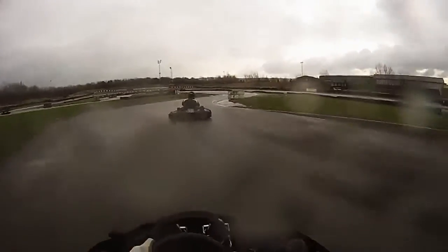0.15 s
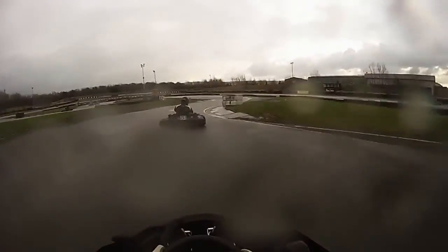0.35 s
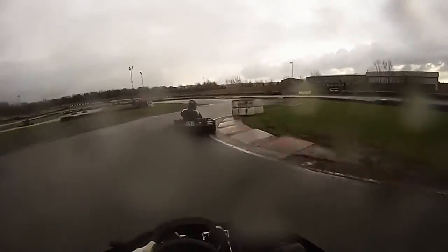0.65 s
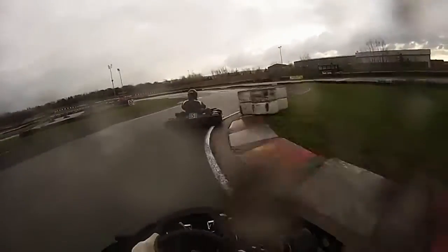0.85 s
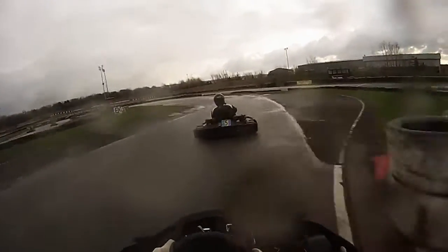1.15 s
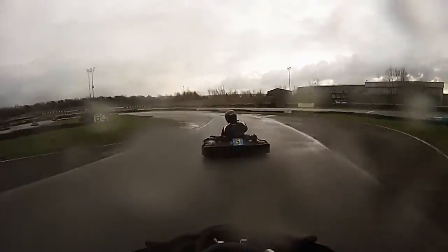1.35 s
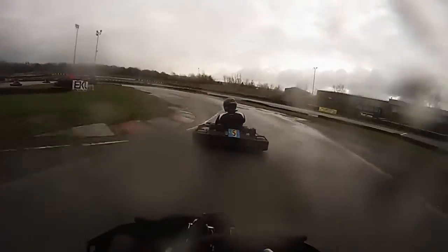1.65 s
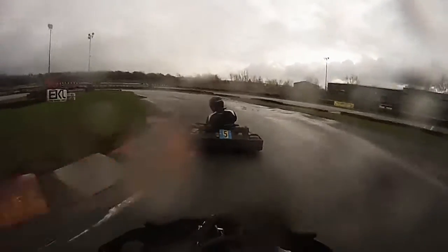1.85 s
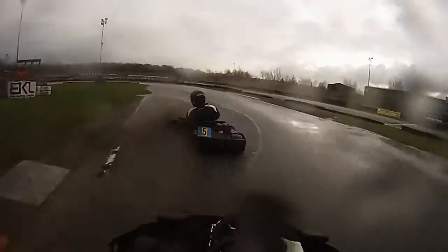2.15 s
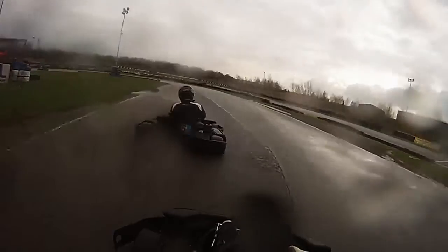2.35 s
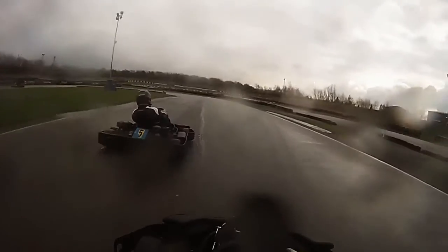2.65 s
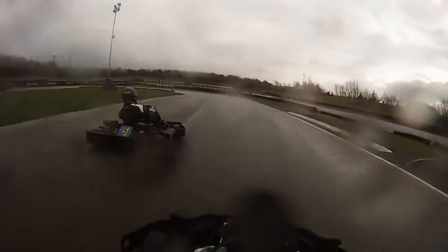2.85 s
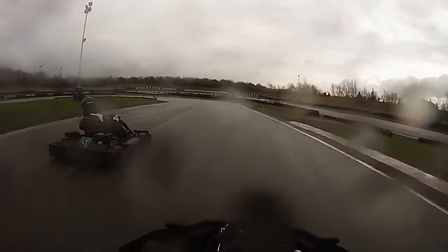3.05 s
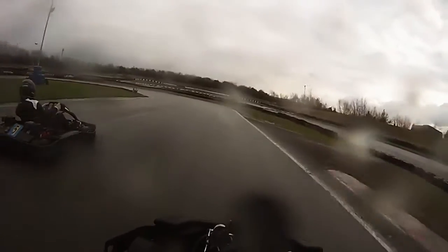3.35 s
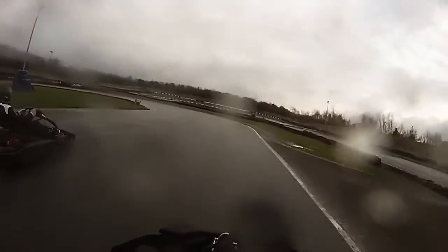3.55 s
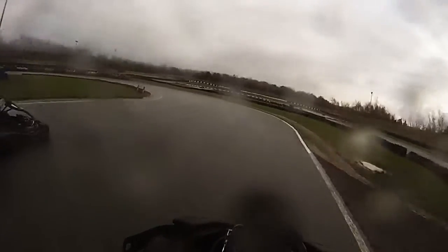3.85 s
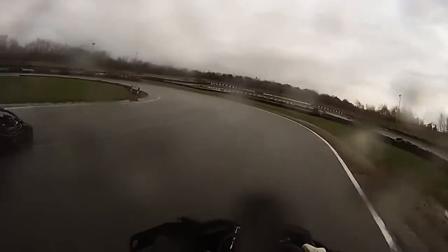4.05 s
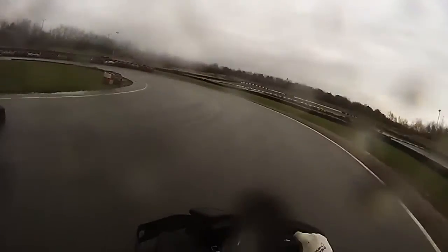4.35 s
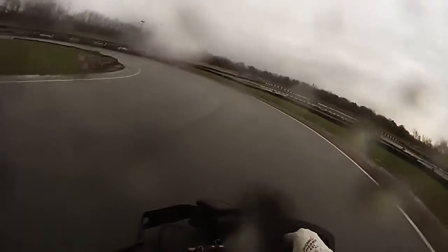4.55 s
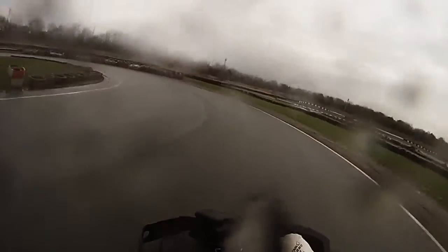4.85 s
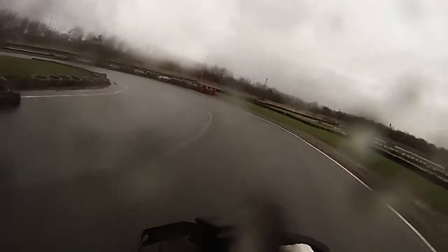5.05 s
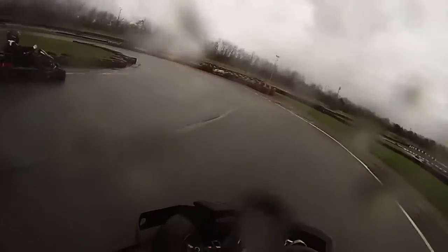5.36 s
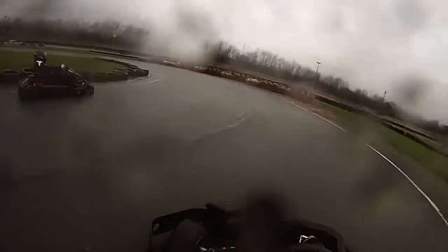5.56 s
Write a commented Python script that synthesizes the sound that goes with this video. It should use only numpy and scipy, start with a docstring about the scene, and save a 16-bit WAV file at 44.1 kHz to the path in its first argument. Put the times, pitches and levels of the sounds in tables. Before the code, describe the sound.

Onboard a kart on a wet track: boxy roar, shuddering bass, rasping engine, rapid exhaust cracks from a kart being passed, then quieter coasting.

```python
"""Two karts on a wet track, heard from a helmet microphone in a closed housing. At first the rider's engine drones
and rasps, and from 0.4 s the exhaust of the kart ahead cracks at each firing. Splashes fall between 1.4 and 2.6 s;
the cracks end near 2.8 s, as that kart is passed. After 3.5 s the rider's engine coasts down, and at 5.6 s an
engine, probably the rider's, gives three cracks. Throughout, tyre roar, hiss and spray are shaped noise, drops
tick on the housing as noise bursts, and gusts and jolts shake the helmet mount, a wavering low tone."""
import sys
import numpy as np
from scipy import signal
from scipy.fft import rfft, irfft, next_fast_len
from scipy.io import wavfile
from scipy.ndimage import uniform_filter1d, map_coordinates

SR = 44100
rng = np.random.default_rng(int(sys.argv[2]) if len(sys.argv) > 2 else 0)


def dump(signal):
    """Clip the signal to [-1, 1] and save it as 16-bit WAV at the path in sys.argv[1]."""
    limited = np.clip(np.atleast_2d(signal).T, -1, 1)
    pcm = np.round(limited * 32767).astype(np.int16)
    wavfile.write(sys.argv[1], SR, pcm)


N = 251370  # samples
T = np.arange(N) / SR  # s

# Rider's engine, close by. Each row: time in seconds, firing rate in Hz, load as a level in dB.
OWN_ENGINE = [(0, 33.92, -50), (1, 33.25, -50), (1.12, 33.46, -43), (1.6, 33.68, -45), (1.95, 34.31, -42.5),
              (2.4, 35.22, -41.5), (3.5, 35.97, -44), (3.65, 36.17, -56), (5.7, 30.02, -62.5)]
# Its exhaust note. Each row: multiple of the firing rate, level in dB over the load.
EXHAUST_NOTE = [(9, -8), (10, -10.5), (11, 0), (12, -3), (13, 1.5), (14, -2.5), (15, -5.5), (16, -12),
                (17, -6), (18, -5.5), (19, -11.5), (20, -9), (21, -7.5), (22, -10)]
# Last cracks, as an engine's throttle opens again, probably the rider's. Each row: time in seconds, level in dB.
PICKUP_CRACKS = [(5.587, -35), (5.635, -27.5), (5.677, -26)]
# Engine of the kart ahead. Each row: time in seconds, firing rate in Hz.
AHEAD_ENGINE = [(0.37, 28.178), (0.8, 29.723), (1.2, 30.091), (1.6, 30.49), (2.0, 31.789), (2.4, 32.026),
                (2.8, 32.289)]
# How hard the exhaust of the kart ahead cracks. Each row: time in seconds, level in dB.
CRACK_LEVELS = [(.388, -25.5), (.6, -24.5), (1.348, -24.5), (2.15, -19.5), (2.78, -24.5)]
# Road and wind. Each row: time in seconds, tyre roar in dB, wind in dB.
ROAD_AND_WIND = [(0, -21.5, -25.5), (.15, -26, -32), (.9, -23.5, -30), (1.8, -21, -30), (2.3, -22, -27),
                 (2.7, -22.5, -28), (2.85, -24, -29), (3.3, -23, -29.5), (3.75, -24, -28.5),
                 (4.45, -25.5, -32), (4.7, -27.5, -32), (5.5, -30.5, -36.5), (5.7, -29.5, -37.5)]
# Tyres crossing standing water. Each row: start in seconds, length in seconds, spray level in dB.
WATER_SPLASHES = [(1.466, 0.051, -38), (1.608, 0.048, -35.5), (1.702, 0.077, -38), (1.775, .11, -34.5),
                  (2.434, 0.12, -37.5)]
# Drops and grit on the housing. Each row: time in seconds, tap level in dB, body level in dB over the tap.
HOUSING_TICKS = [(0.3885, -36, 4), (0.5038, -37, 6), (0.5344, -36, 17.5), (0.809, -23.5, 6),
                 (1.478, -25, -4), (1.5755, -21, -6), (1.71, -24, 4), (1.8483, -30, -2), (1.891, -28, 4),
                 (2.4857, -32, 6), (2.665, -31, 17), (3.429, -45, 8), (3.461, -35, 13), (3.6721, -23, 10.5),
                 (4.226, -29, 14.5), (4.7104, -36, 16), (5.2811, -36, 6)]
# Jolts that ring the mount. Each row: middle in seconds, peak in dB, length in seconds, pitch in Hz.
MOUNT_JOLTS = [(0.015, -9, 0.17, 71.6), (0.197, -16.5, 0.1, 66.4), (.29, -14.5, 0.1, 66.6),
               (0.535, -19.5, 0.34, 67.27), (.75, -24.5, 0.29, 75.2), (1.157, -18, 0.11, 70.8),
               (1.438, -13.5, 0.091, 70.8), (1.57, -22, .14, 73), (1.775, -10, 0.07, 72.9),
               (1.895, -18, 0.07, 72.1), (2.175, -14, 0.085, 73.6), (2.285, -11, 0.089, 78.1),
               (2.35, -18, .12, 74.6), (2.439, -16, 0.066, 71.5), (2.584, -16, 0.15, 68.2),
               (2.675, -11, 0.074, 76.7), (2.76, -8, 0.054, 70.2), (2.842, -10.5, .11, 76.6),
               (2.982, -7.5, .13, 74.9), (3.066, -14, 0.032, 72.8), (3.301, -10, 0.2, 74),
               (3.456, -15, 0.086, 79.23), (3.65, -17, 0.073, 75.2), (3.802, -10.5, 0.19, 73.44),
               (3.985, -11.5, 0.16, 67.13), (4.14, -15, 0.15, 71.7), (4.348, -12.5, 0.28, 71.45),
               (4.476, -14, .16, 72.15), (4.983, -21.5, 0.14, 67), (5.37, -18.5, 0.26, 73)]
# Spectrum of wind buffeting through the wall. Each row: frequency in Hz, relative level in dB per Hz.
BUFFET_SPECTRUM = [(60, -17), (100, 6), (140, -2.5), (190, 0.5), (225, -5), (268, -2), (341, -10),
                   (613, -15.5), (1100, -24), (1430, -59)]
# Sudden gusts on the shell. Each row: time in seconds, level in dB.
GUST_THUDS = [(1.44, -28.5), (2.33, -27.5), (2.68, -28), (3.22, -29), (3.78, -27), (4.27, -28.5),
              (4.97, -38.5)]
# Faint high chirps. Each row: start in seconds, peak in dB, pitch in Hz.
HIGH_CHIRPS = [(0.1433, -45, 9590), (0.1598, -42, 9500), (0.1735, -38, 9500), (0.263, -52, 9250),
               (3.6973, -35, 9460), (4.1956, -38, 9530), (5.1492, -46, 11040), (5.1577, -42, 9160),
               (5.3911, -41, 9480), (5.5286, -47, 9600)]
# Colour of the closed housing. Each row: frequency in Hz, gain in dB.
HOUSING_COLOUR = [(410, -41), (700, -17), (1100, -16), (1260, -6.5), (1570, 0), (2060, -11), (2530, -11),
                  (3000, -17.5), (4200, -19.5), (5300, -21), (7900, -31), (11100, -36), (13000, -44),
                  (15100, -46.5)]
# Narrow dips and peaks of its port. Each row: frequency in Hz, width in Hz, gain in dB.
PORT_FEATURES = [(3270, 91, -5), (3456, 132, 3.5), (5880, 170, -7), (6900, 260, 4), (9150, 250, 2.5)]
# How far the channels stand apart. Each row: frequency in Hz, side minus mid in dB.
CHANNEL_SPREAD = [(60, -50), (110, -56), (200, -41), (370, -31), (690, -27), (1270, -46), (2340, -31.5),
                  (4310, -22), (7930, -19), (14600, -21)]

OWN_FIRES_AT, AHEAD_FIRES_AT = 3.013, .381  # s, one firing of each engine
HISS_DB, SPRAY_DB = -11, -25.5  # wet hiss and steady spray over the steady wetness
WET_GROWS, ROAR_MID_DB = 1.17, -24  # wetness swings wider than the roar around this level
SPLASH_EDGE_S, SPLASH_HISS_DB = 0.013, 1.5  # rise and fall; the hiss in a splash over its spray
SHUDDER_DB, FUZZ_DB = 6, -4  # ringing between jolts over the wind; unpitched part under the ringing
DEEP_DB = -0.5  # deep gusts over the wind
TOP_HZ = 15250  # band limit of the input stage


def own_engine():
    """The pipe sings multiples of the firing rate, each a little unsteady; every firing adds a rasp of gas."""
    hz, load_db = curves(OWN_ENGINE)
    turns, times = firings(hz, OWN_FIRES_AT, jitter=0.0023)
    note = np.zeros(N)
    for multiple, db in EXHAUST_NOTE:
        level = amp(db + 2 * wobble(6))
        drift = .04 * wobble(8) + rng.random()  # in cycles
        note += level * np.sin(2 * np.pi * (multiple * turns + drift))
    rasp_db = 17 + np.interp(times, T, load_db) + 0.66 * rng.standard_normal(len(times))
    gas = band(rng.standard_normal(N), 5300, octaves=1.35)
    rasp = puffs(times - .002, rasp_db, rise=0.0027, t60=0.049) * gas
    return rasp, amp(load_db) * np.sqrt(2) * note


def kart_ahead():
    """Its exhaust points back at the rider: each firing is one bright crack of gas noise."""
    hz, = curves(AHEAD_ENGINE)
    _, times = firings(hz, AHEAD_FIRES_AT, jitter=.0005)
    s, db = np.transpose(CRACK_LEVELS)
    # -120 dB keeps it silent before the first row and after the last
    strength_db = np.interp(times, s, db, -120, -120) + 0.94 * rng.standard_normal(len(times))
    return puffs(times - .001, strength_db, rise=0.00083, t60=0.031) * crack_gas()


def throttle_pickup():
    """An engine's throttle opens again, probably the rider's: a few cracks of gas noise, softer in onset."""
    s, db = np.transpose(PICKUP_CRACKS)
    return puffs(s, db, rise=0.0017, t60=0.044) * crack_gas()


def crack_gas():
    """Noise of exhaust gas in a crack: a broad patchy bright band and a narrower body."""
    bright = band(patchy(depth_db=-2.0), 6200, octaves=1.15)
    return bright + band(rng.standard_normal(N), 1670, octaves=0.42)


def firings(rate_hz, fires_at, jitter):
    """Crank phase counted in firings, and the time of each firing, scattered by jitter seconds."""
    turns = np.cumsum(rate_hz) / SR
    turns -= turns[round(fires_at * SR)]
    whole = np.arange(np.ceil(turns[0]), turns[-1])
    return turns, np.interp(whole, turns, T) + jitter * rng.standard_normal(len(whole))


def mount():
    """One low mode: the wind keeps it shuddering, each jolt swells it smoothly; narrow fuzz lies under the tone."""
    s, db, length, hz = np.transpose(MOUNT_JOLTS)
    away = np.clip((T - s[:, None]) / length[:, None], -.5, .5)
    jolts = amp(db) @ np.cos(np.pi * away) ** 2
    _, wind_db = curves(ROAD_AND_WIND)
    shudder = amp(wind_db + SHUDDER_DB + 3 * wobble(14))
    swell = np.hypot(jolts, shudder)
    pitch_hz = np.interp(T, s, hz) + 4.5 * wobble(16)
    phase = 2 * np.pi * np.cumsum(pitch_hz) / SR
    tone = np.sqrt(2) * np.sin(phase) * amp(1.6 * wobble(24))
    fuzz = unit(filtered(rng.standard_normal(N), lambda f: np.exp(-((f - 72) / 22) ** 2)))
    slow_swell = uniform_filter1d(swell, size=SR // 10)
    return swell * tone + amp(FUZZ_DB) * slow_swell * fuzz


def road():
    """Tyre roar and wet hiss enter the housing; buffeting and deep gusts reach the microphone through its wall."""
    roar_db, wind_db = curves(ROAD_AND_WIND)
    steady, splash = wetness()
    grain_db = .6 * wobble(14) + .9 * wobble(40)  # flicker shared by roar and hiss
    roar = amp(roar_db + grain_db) * band(patchy(depth_db=1.0), 1746, octaves=1.0)
    hiss_gain = amp(HISS_DB) * steady + amp(SPLASH_HISS_DB) * splash
    hiss = hiss_gain * amp(grain_db) * band(patchy(depth_db=1.0), 5350, octaves=1.0)
    buffet = unit(filtered(patchy(depth_db=0.86), lambda hz: amp(along(BUFFET_SPECTRUM, hz))))
    buffet *= amp(wind_db + 1.23 * wobble(17))
    deep = unit(filtered(rng.standard_normal(N), lambda hz: np.exp(-((hz - 38) / 14) ** 2)))
    deep *= amp(wind_db + DEEP_DB + 0.91 * wobble(3.97))
    return roar + hiss, buffet + deep


def wetness():
    """Gain of the steady water noise, which follows the roar, and of the splashes on top of it."""
    roar_db, _ = curves(ROAD_AND_WIND)
    steady = amp(ROAR_MID_DB + WET_GROWS * (roar_db - ROAR_MID_DB))
    edge = lambda s: np.clip((T - s) / SPLASH_EDGE_S, 0, 1)
    splash = sum(amp(db) * (edge(s) - edge(s + length)) for s, length, db in WATER_SPLASHES)
    return steady, splash


def spray():
    """Droplets, each a short ping of its own pitch and size, over a bright fizz."""
    steady, splash = wetness()
    drops = (3000, 1)
    when, size, pitch = rng.random(drops), rng.standard_normal(drops), rng.standard_normal(drops)
    hz = np.clip(10500 * np.exp(.25 * pitch), 5000, 15000)
    t = T[:200]
    size_db = 5.5 * np.clip(size, -2.5, 2.5)
    decay_db = -60 * t * hz / 18  # 60 dB down in 18 cycles
    onset = 1 - np.exp(-t / 0.000094)
    pings = amp(size_db + decay_db) * np.sin(2 * np.pi * hz * t) * onset
    at = (when * N).astype(int) + np.arange(len(t))
    patter = unit(np.bincount(at.ravel(), pings.ravel(), N + len(t))[:N])
    water = band(rng.standard_normal(N) + 0.63 * patter, 14000, octaves=1.0)
    return (amp(SPRAY_DB) * steady + splash) * amp(0.8 * wobble(29.9)) * water


def ticks():
    """Each drop is a sharp tap of noise, with a duller body that is stronger where the drop is heavy."""
    s, db, body_db = np.transpose(HOUSING_TICKS)
    tap = puffs(s, db, rise=0.00014, t60=0.023) * band(rng.standard_normal(N), 8900, octaves=0.93)
    body = puffs(s, db + body_db, rise=0.0002, t60=0.02) * band(rng.standard_normal(N), 2560, octaves=0.66)
    return tap + body


def thuds():
    """A gust slaps the shell: a short puff of low noise."""
    s, db = np.transpose(GUST_THUDS)
    low = filtered(rng.standard_normal(N), lambda hz: bell(hz, 190, 0.5))
    return puffs(s - .02, db, rise=0.011, t60=0.25) * unit(low)


def chirps():
    """Brief narrow squeaks high up: sines with a smooth swell and a slightly wandering phase."""
    out, t = np.zeros(N + SR), T[:900]
    swell = np.sin(np.pi * np.clip(t / 0.0093, 0, 1)) ** 2
    for s, db, hz in HIGH_CHIRPS:
        wander = 0.74 * np.cumsum(rng.normal(0, 0.15, len(t)))
        out[round(s * SR):][:len(t)] += amp(db) * swell * np.sin(2 * np.pi * hz * t + wander)
    return out[:N]


def housing_db(hz):
    """Broad colour of the shell plus the narrow features of its port."""
    port = sum(db * np.exp(-.5 * ((hz - at) / width) ** 2) for at, width, db in PORT_FEATURES)
    return along(HOUSING_COLOUR, hz) + port


def band(x, centre_hz, octaves):
    """A broad band of x, scaled to reach rms 1 inside the housing."""
    shape = lambda hz: bell(hz, centre_hz, octaves)
    inside = filtered(x, lambda hz: shape(hz) * amp(housing_db(hz)))
    return filtered(x, shape) / np.sqrt(np.mean(inside ** 2))


def bell(hz, centre_hz, octaves):
    """Gaussian gain over log frequency, octaves wide to one standard deviation."""
    return np.exp(-.5 * (np.log2((hz + 1) / centre_hz) / octaves) ** 2)


def patchy(depth_db):
    """Noise whose gain varies in random patches of time and frequency."""
    z = signal.stft(rng.standard_normal(N + 512), nperseg=512)[2]
    field = uniform_filter1d(rng.standard_normal(z.shape), size=8, axis=0)
    field = uniform_filter1d(field, size=8, axis=1)
    return unit(signal.istft(z * amp(depth_db * unit(field)), nperseg=512)[1][:N])


def puffs(times, db, rise, t60):
    """Envelope of short bursts at the given times and peak levels; rise and 60 dB decay in seconds."""
    kicks = np.bincount(np.clip(np.round(times * SR).astype(int), 0, N - 1), amp(db), N)
    t = T[:SR // 3]
    shape = (1 - np.exp(-t / rise)) * amp(-60 * t / t60)
    return signal.fftconvolve(kicks, shape / shape.max())[:N]


def wobble(rate):
    """A smooth random curve, rate knots a second."""
    return map_coordinates(rng.standard_normal(int(N * rate / SR) + 4), [T * rate])


def filtered(x, response):
    """x passed through a complex response of frequency."""
    m = next_fast_len(N + SR // 2)
    return irfft(rfft(x, m) * response(np.fft.rfftfreq(m, 1 / SR)), m)[..., :N]


def causal(gain_db):
    """The minimum-phase response with the given gain in dB over frequency."""
    def response(hz):
        cepstrum = irfft(np.log(amp(gain_db(hz))))
        cepstrum[1:len(hz) - 1] *= 2  # fold negative time onto positive
        cepstrum[len(hz):] = 0
        return np.exp(rfft(cepstrum))
    return response


def along(points, hz):
    """Read (Hz, value) points on a log frequency axis."""
    f, v = np.transpose(points)
    return np.interp(np.log(hz + 1), np.log(f + 1), v)


def curves(rows):
    """One value per sample for each column after the time."""
    s, *cols = np.transpose(rows)
    return [np.interp(T, s, c) for c in cols]


def amp(db):
    """Amplitude of a level in dB."""
    return 10 ** (np.asarray(db) / 20)


def unit(x):
    """x scaled to rms 1."""
    return x / np.sqrt(np.mean(x ** 2) + 1e-20)


def scene():
    """Airborne sound passes through the housing, structure-borne sound does not; the two channels barely differ."""
    rasp, note = own_engine()
    roar, buffet = road()
    outside = rasp + kart_ahead() + throttle_pickup() + roar + spray() + ticks()
    mid = filtered(outside, causal(housing_db)) + note + mount() + buffet + thuds() + chirps()
    hz, _, z = signal.stft(mid, SR, nperseg=1024)
    # the side signal is the mid with random phases
    scattered = z * amp(along(CHANNEL_SPREAD, hz))[:, None] * np.exp(2j * np.pi * rng.random(z.shape))
    side = signal.istft(scattered, SR, nperseg=1024)[1][:N]
    return np.array([mid + side, mid - side])


def record(dry):
    """The input stage rounds off the highest peaks; nothing is kept above the band limit."""
    soft = dry / (1 + np.abs(dry / .85) ** 4) ** (1 / 4)
    return filtered(soft, lambda hz: hz < TOP_HZ)


dry = scene()
out = record(dry)
dump(out)
```